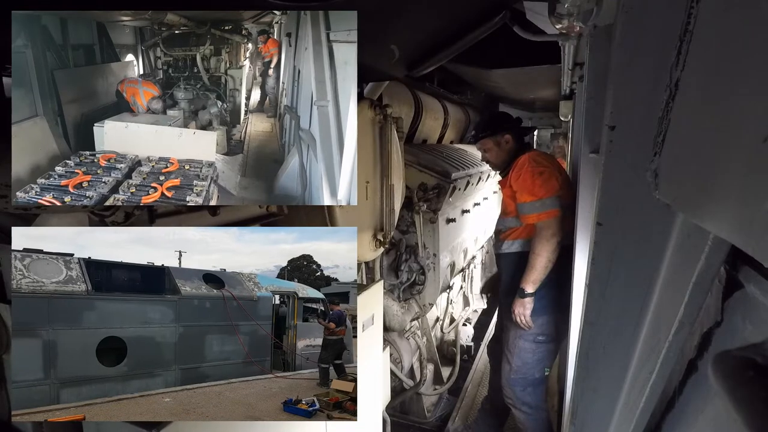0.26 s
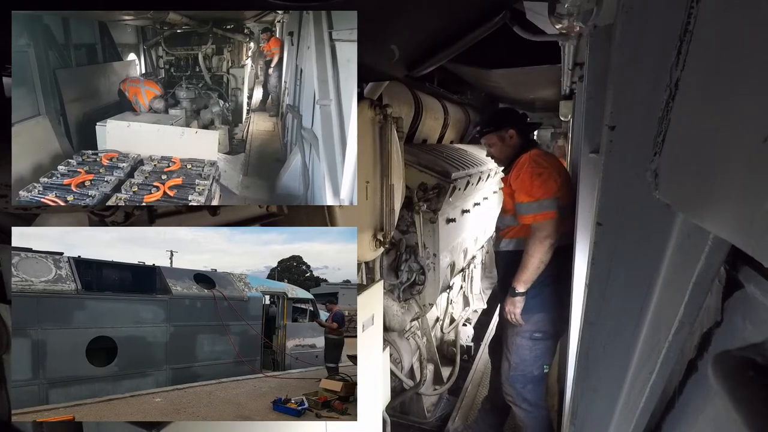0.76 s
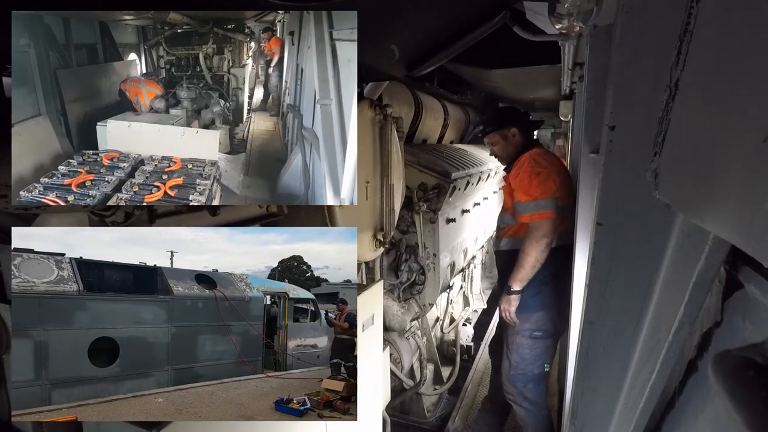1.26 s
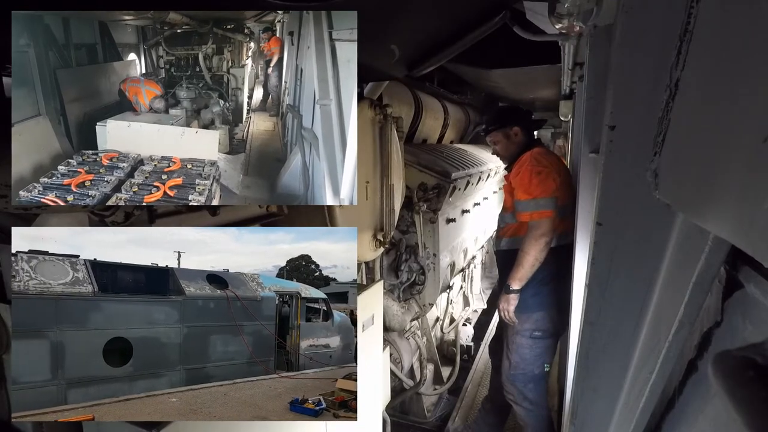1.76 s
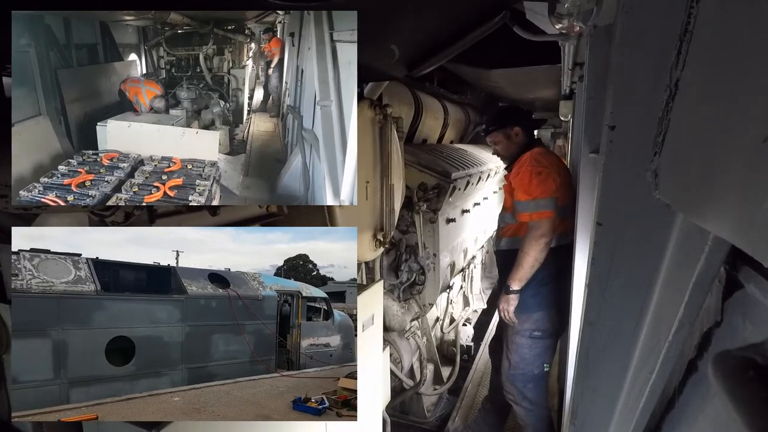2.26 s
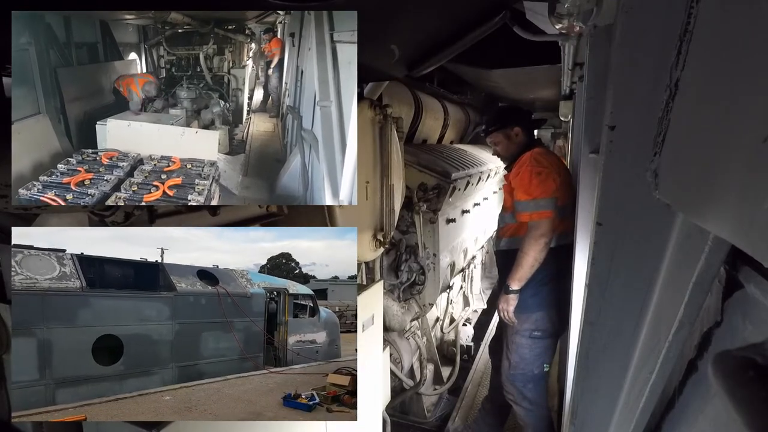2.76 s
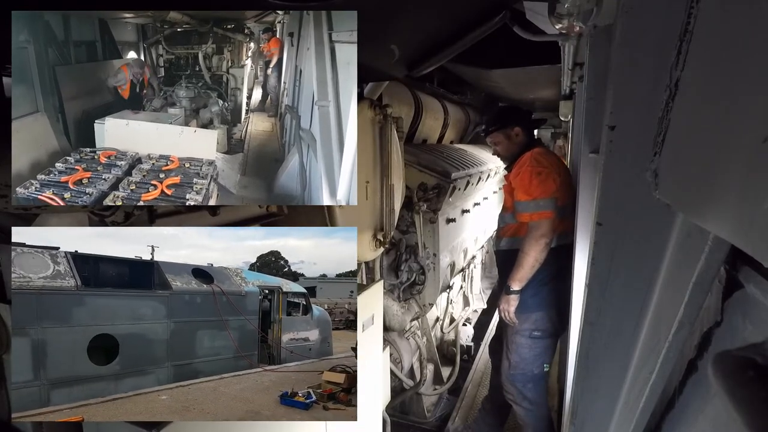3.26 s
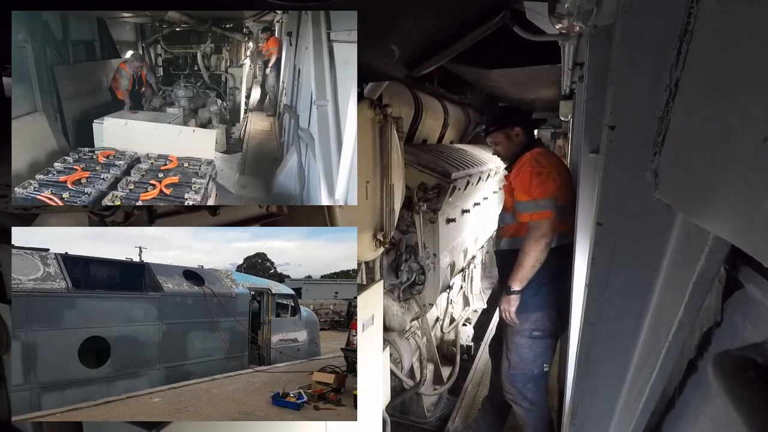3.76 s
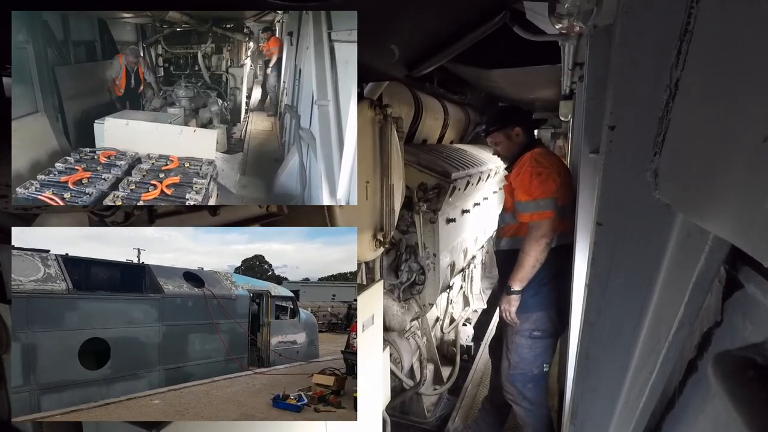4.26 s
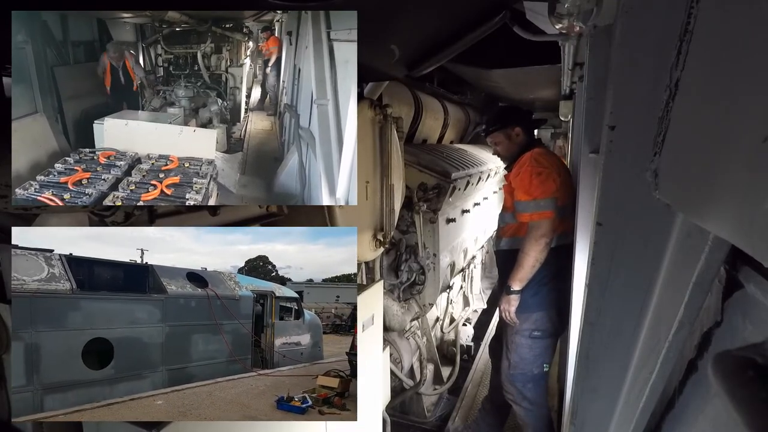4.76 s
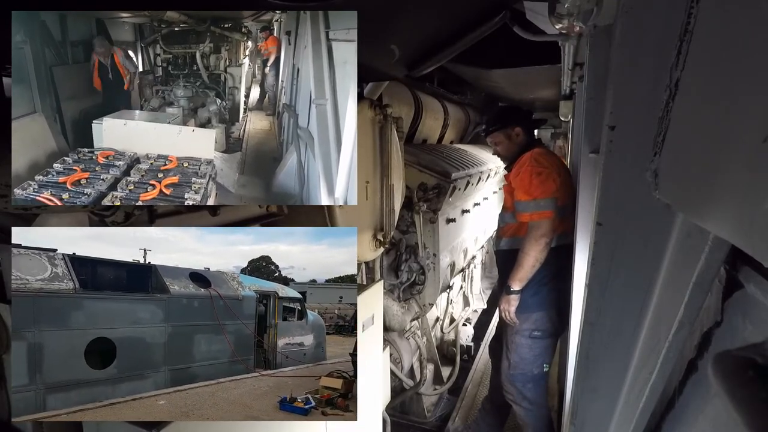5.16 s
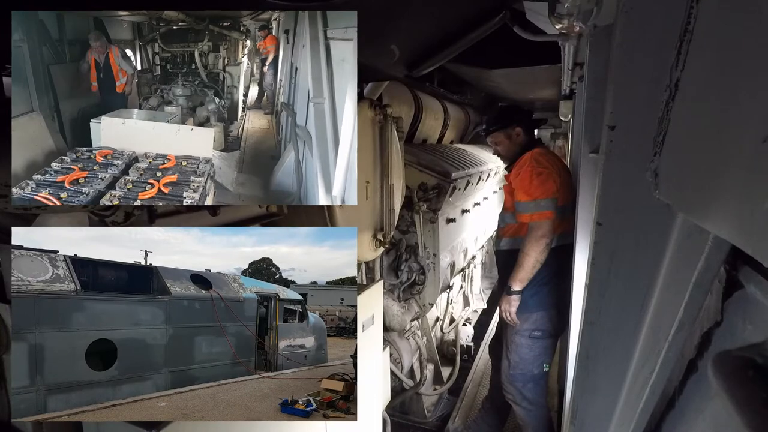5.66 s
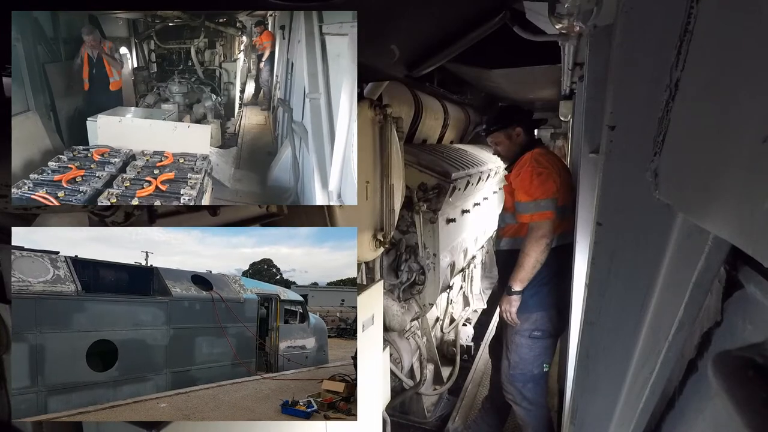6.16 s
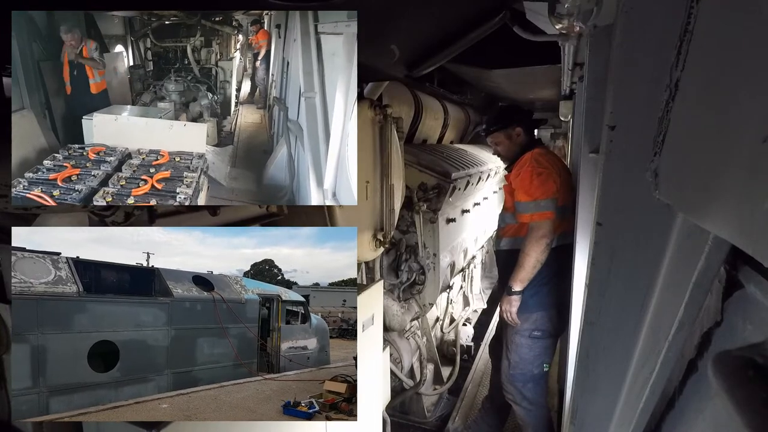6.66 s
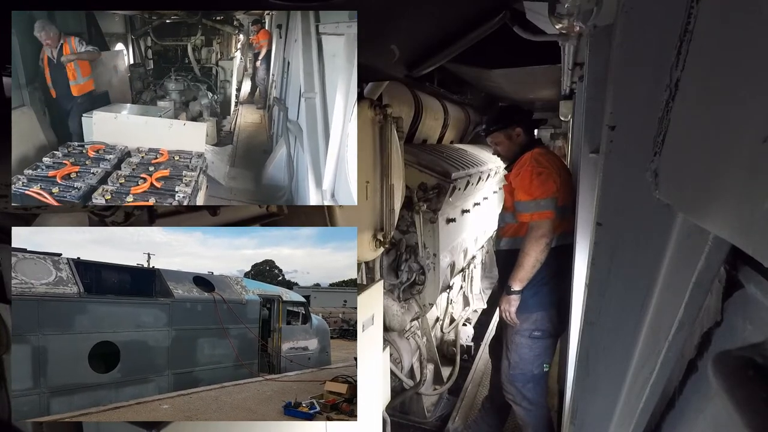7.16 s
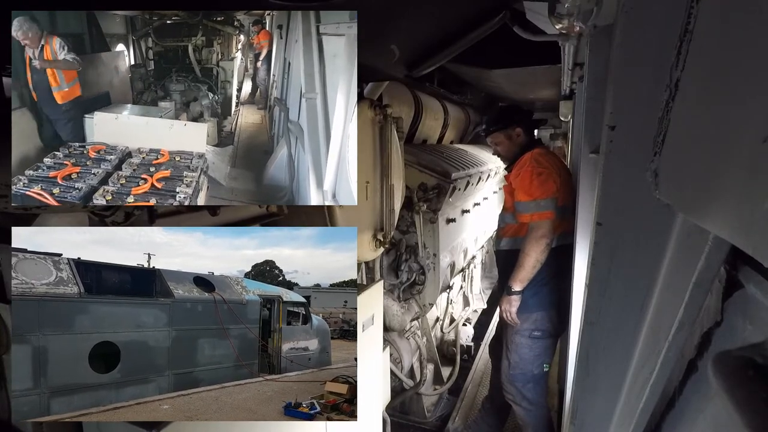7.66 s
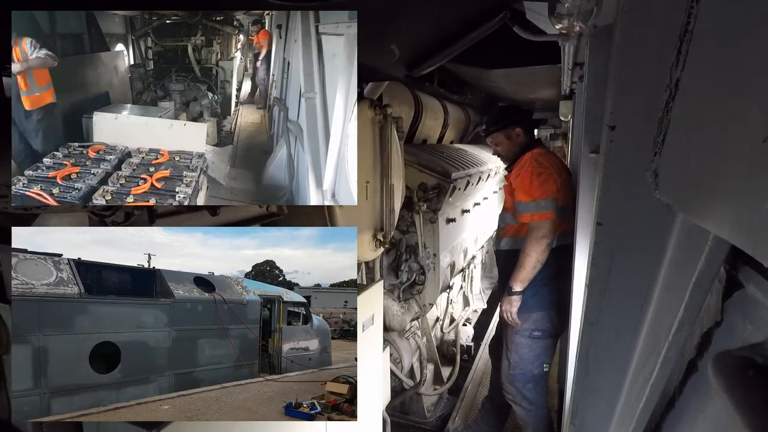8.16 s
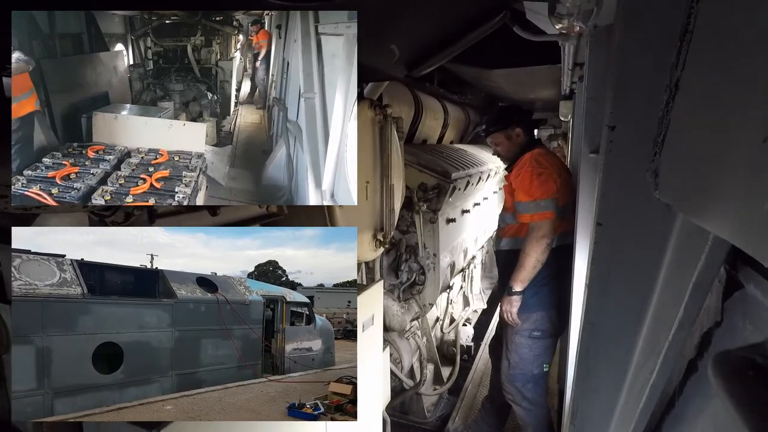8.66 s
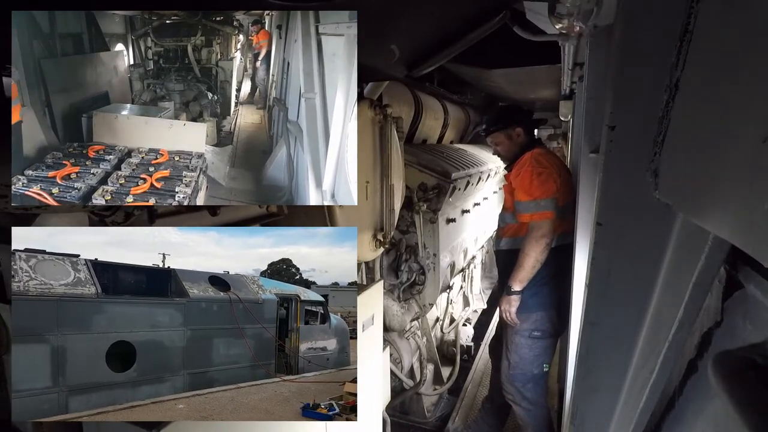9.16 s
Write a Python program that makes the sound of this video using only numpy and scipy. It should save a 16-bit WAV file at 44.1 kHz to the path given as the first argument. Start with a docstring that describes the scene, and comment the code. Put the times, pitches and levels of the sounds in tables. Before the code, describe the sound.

Inside a cramped engine compartment, a heavy diesel runs at constant idle, its deep lumpy throb mixed with rattling covers, humming gears and fizzing mechanical hiss.

```python
"""Inside a locomotive's engine room: a sixteen-cylinder two-stroke diesel idles near 307 rpm, in stereo.
Uneven firing pulses ring low resonances into a boom, and a random rattle repeats on every turn.
Churning noise, sine gear tones, a throbbing drone and two buzzing panel resonances fill the middle.
A bright hiss of rubbing and ticking noise swells once per turn; only its highest part differs by channel."""
import sys
import numpy as np
from scipy import signal
from scipy.fft import rfft, irfft, next_fast_len
from scipy.io import wavfile
from scipy.ndimage import uniform_filter1d, map_coordinates

SR = 44100
rng = np.random.default_rng(int(sys.argv[2]) if len(sys.argv) > 2 else 0)


def log_audio(samples):
    """Write samples as a 16-bit WAV file to the path given in sys.argv[1]."""
    # one column per channel
    frames = np.atleast_2d(samples).T
    # limit to full scale, then quantise
    limited = np.clip(frames, -1, 1)
    pcm = np.round(limited * 32767).astype(np.int16)
    wavfile.write(sys.argv[1], SR, pcm)


N = 414540
T = np.arange(N) / SR  # time [s]

# brief rises in shaft speed: (time [s], half width [s], extra speed [turns/s])
SPEED_SURGES = [(1.107, .988, .0562), (4.8, 1.761, .0162), (8.038, .669, .0193)]
# meshing gear tones: (multiple of crank speed [1], rms level [dB])
GEAR_TONES = [(218, -51), (238, -46.5), (317, -52.5), (394, -50), (475, -54)]
# spectrum of the rubbing and ticking: (frequency [Hz], relative level [dB])
HISS_SPECTRUM = [(600, -24), (1400, -6.5), (2280, -7), (2550, -5.5), (3600, -6), (5100, -3), (6200, 0.44),
                 (7000, -3), (7650, -12.5), (8500, -12), (9800, -20), (11300, -32.5), (12200, -18),
                 (15200, -24.5)]
# steel covers singing in the hiss: (frequency [Hz], width [Hz], relative level [dB])
COVER_MODES = [(2520, 26, 0.5), (2470, 66, -5), (5500, 37, -2), (5930, 34, -2.5), (6240, 41, -4),
               (6900, 44, -4)]
# spectrum of air and oil in the casing: (frequency [Hz], relative level [dB])
CHURN_SPECTRUM = [(60, -20), (110, 5.5), (180, 12.5), (230, 0), (285, 4.5), (330, -3), (450, 0), (560, 3.5),
                  (830, -1), (1020, -8.5), (1280, -11), (1900, -27.5), (4000, -21)]
# knocks of the running gear: (crank position [turns], relative strength [dB])
GEAR_KNOCKS = [(.005, 2.5), (.095, 0), (.156, 4.5), (.25, -6.5), (.405, 3), (.511, -3), (.617, -10),
               (.78, -3), (.965, 5)]
# crankcase panel modes: (frequency [Hz], width [Hz], relative level [dB])
PANEL_MODES = [(271, 5.8, -2.5), (296.8, 10.6, -1.5), (311, 8.5, -3), (364, 6.2, -3), (377.3, 11, 0.5),
               (396, 50, -3.5), (492.4, 16, -1), (528.6, 7.7, 4), (528, 38, -6.5), (563, 16, 2),
               (585, 46, -0.5), (660, 14, 2.5), (674.5, 3.5, 5), (726, 7.7, 1), (744, 16, -20),
               (795, 32, 0), (817, 62, -3.5), (960, 47, -16.5), (1250, 39, -17.5)]
# how well the panels radiate: (frequency [Hz], relative level [dB])
PANEL_RADIATION = [(200, -54), (265, 1), (850, -4.5), (1050, -6.5), (1250, -4.5), (2200, -23)]
# one firing per cylinder and turn: (crank position [turns], relative strength at the listener [dB])
CYLINDER_FIRINGS = [(.025, -5.3), (.076, -11), (.11, -.6), (.175, -7.1), (.216, -1), (.282, -4.8),
                    (.351, -.3), (.423, 5.4), (.464, .5), (.526, -4.6), (.618, 2.2), (.661, -3.3),
                    (.744, 6.4), (.798, -3.7), (.876, -2), (.941, -12)]
# exhaust and room resonances: (frequency [Hz], width [Hz], relative level [dB], sign at the listener [1])
BOOM_MODES = [(40.7, 2.5, -11.2, 1), (76.1, 6.1, -12.8, -1), (92.5, 5.6, -7.2, -1), (118.7, 18.1, -15.4, 1),
              (147.0, 41.2, -19.3, 1), (175.0, 7.8, -8.2, 1), (191.4, 7.0, -16.1, -1),
              (254.8, 7.0, -25.1, -1), (279.5, 33.3, -21.0, 1)]

IDLE_TURNS_PER_S = 5.1001
HISS_DB, SIDE_DB = -28, -2  # rms of the hiss; gain of its part that differs between channels
SWELL_AT_TURNS, SWELL_SQUARENESS = 0.49, 1.28  # where the hiss is strongest; how flat its crest and trough are
HUM_DB, HUM_DB_PER_TURN_PER_S = -25.8, 60  # drone at idle; its rise with speed
CLATTER_DB, CHURN_DB = -19.7, -25  # rms of the running gear; of the air and oil around it
APART_HZ, TOP_HZ = 11000, 15250  # channels differ only above the first; nothing passes above the second


def amp(db):
    """Decibels to gain."""
    return 10 ** (np.asarray(db) / 20)


def unit(x):
    """Scale to rms 1."""
    return x / np.sqrt(np.mean(x ** 2) + 1e-20)


def colour(points, hz):
    """Gain of (frequency [Hz], level [dB]) points on a log axis, closed at both ends."""
    f, db = np.transpose(points)
    return amp(np.interp(np.log(hz + 1), np.log(f + 1), db, left=-120, right=-120))


def wobble(rate):
    """A smooth random curve with rate knots a second."""
    knots = rng.standard_normal(int(N * rate / SR) + 4)
    return map_coordinates(knots, [T * rate])


def filtered(x, response):
    """Filter x by a complex response of frequency."""
    size = next_fast_len(N + SR // 2)
    hz = np.fft.rfftfreq(size, 1 / SR)
    return irfft(rfft(x, size) * response(hz), size)[..., :N]


def noise(spectrum):
    """Coloured noise of rms 1."""
    return unit(filtered(rng.standard_normal(N), lambda hz: colour(spectrum, hz)))


def resonance(f, hz, width):
    """Response of one damped mode, 1 at its centre."""
    return 1j * f * width / (hz * hz - f * f + 1j * f * width)


def mode_power(modes, f):
    """Summed power response of (frequency [Hz], width [Hz], level [dB]) modes."""
    return sum(np.abs(amp(db) * resonance(f, hz, width)) ** 2 for hz, width, db in modes)


def shaft_speed():
    """Turns per second: idle, with a smooth hump for each surge."""
    humps = sum(extra * np.exp(-((T - s) / width) ** 2) for s, width, extra in SPEED_SURGES)
    return IDLE_TURNS_PER_S + humps


def gears(crank, flutter_db, backlash):
    """Tooth-mesh tones, locked to the shaft and unsteadied by backlash (radians)."""
    total = 0
    for order, db in GEAR_TONES:
        level = amp(db + flutter_db * wobble(9)) * np.sqrt(2)
        phase = 2 * np.pi * round(order) * crank + backlash * wobble(7)
        total = total + level * np.sin(phase)
    return total


def hiss(crank, swell_db, bright_swell_db, waver, tick_db, ticks_per_s, ring_db, ring_t60):
    """Fine ticking and rubbing that swells once each turn and rings the steel covers."""
    once_a_turn = np.cos(2 * np.pi * (crank - SWELL_AT_TURNS))
    swell = np.tanh(SWELL_SQUARENESS * once_a_turn) + waver * wobble(20)
    # the walls answer with a decaying noise tail
    t = T[:SR // 3]
    walls = unit(rng.standard_normal(len(t)) * amp(-60 * t / ring_t60)) / np.sqrt(len(t))
    rub, sizes = rng.standard_normal((2, N + len(t) - 1))
    ticks = unit(sizes * (rng.random(len(sizes)) < ticks_per_s / SR))
    contact = rub + amp(tick_db) * ticks
    sound = contact[-N:] + amp(ring_db) * signal.fftconvolve(contact, walls, "valid")

    def tone(hz):
        return colour(HISS_SPECTRUM, hz) * np.sqrt(1 + 2 * mode_power(COVER_MODES, hz))

    def bright(hz):
        return hz ** 4 / (hz ** 4 + 7500 ** 4)

    # harder contact is brighter: the top swells more than the middle
    middle = filtered(unit(sound * amp(swell_db * swell)), lambda hz: tone(hz) * (1 - bright(hz)))
    top = filtered(unit(sound * amp(bright_swell_db * swell)), lambda hz: tone(hz) * bright(hz))
    return unit(middle + top)


def hum(crank, throb, drift, order=56):
    """A drone locked to the shaft, throbbing twice a turn, its phase drifting (radians)."""
    swell = 1 + throb * np.cos(4 * np.pi * (crank - .12))
    return unit(swell * np.sin(2 * np.pi * order * crank + drift * wobble(9.3)))


def knocking(crank, life_turns, bed):
    """Envelope of the knocks, each dying away over a bed of steady motion."""
    angle = np.linspace(0, 1, num=1024)
    blows = sum(amp(db) * np.exp(-((angle - position) % 1) / life_turns) for position, db in GEAR_KNOCKS)
    return unit(bed + np.interp(crank % 1, angle, blows))


def churn(crank):
    """Air and oil churn in the casing, never twice alike, pushed by the knocks."""
    return unit(noise(CHURN_SPECTRUM) * knocking(crank, life_turns=0.06, bed=2.0))


def buzz(speed, level_db, reach):
    """Two loose panels sing while the shaft runs within reach (turns per second) of its top speed."""
    def panels(f):
        return resonance(f, 540, 42) ** 2 + amp(-1.5) * resonance(f, 695, 67) ** 2

    ringing = unit(filtered(rng.standard_normal(N), panels))
    nearness = np.exp(-((speed.max() - speed) / reach) ** 2)
    return amp(level_db) * nearness * ringing


def clatter(crank, slack_turns, even, size=4096):
    """The same parts meet at the same angles, so one random rattle repeats each turn, with a little slack."""
    hz = np.arange(size // 2 + 1) * crank[-1] / T[-1]  # harmonics of the mean shaft speed
    strength = colour(PANEL_RADIATION, hz) * np.sqrt(mode_power(PANEL_MODES, hz))
    rattle = irfft(strength * np.exp(2j * np.pi * rng.random(len(hz))), size)
    # many cylinders share the turn, so no part of it stays quiet for long
    local_power = np.abs(uniform_filter1d(rattle ** 2, size // 12, mode="wrap"))
    rattle = rattle / local_power ** (even / 2)
    angle = (crank + slack_turns * wobble(30)) % 1
    contacts = map_coordinates(rattle, [angle * size], mode="grid-wrap")
    return unit(contacts * knocking(crank, life_turns=0.024, bed=2.2))


def firing(crank, level_db, scatter_db, jitter_s, muffle_hz):
    """One pressure pulse per cylinder and turn rings the low resonances."""
    position, db = np.transpose(CYLINDER_FIRINGS)
    # the engine is already running: two earlier turns leave the body ringing
    turns = np.arange(-2, int(crank[-1]) + 1)[:, None]
    when = np.interp(turns + position, np.r_[-2, crank], np.r_[-2 / IDLE_TURNS_PER_S, T]).ravel()
    chance = rng.standard_normal((len(when), 2))
    strength = amp(np.tile(db, len(turns)) + scatter_db * chance[:, 0]) * (when < T[-1])
    # times before the start wrap to the padded end, whose ringing spills into the start
    size = next_fast_len(N + SR // 2)
    samples = ((when + jitter_s * chance[:, 1]) * SR).astype(int) % size
    pulses = np.bincount(samples, strength, size)

    def body(f):
        return sum(sign * amp(gain_db) * resonance(f, hz, width) for hz, width, gain_db, sign in BOOM_MODES)

    def muffle(f):
        return 1 / np.sqrt(1 + (f / muffle_hz) ** 40)

    return amp(level_db) * unit(filtered(pulses, lambda f: body(f) * muffle(f)))


def scene():
    """The crankshaft drives everything; the engine sits mid-stereo, with only the highest hiss set apart."""
    speed = shaft_speed()
    crank = np.cumsum(speed) / SR  # turns
    beat = firing(crank, level_db=-12.5, scatter_db=0.5, jitter_s=.00006, muffle_hz=252)
    works = amp(CLATTER_DB) * clatter(crank, slack_turns=0.0002, even=0.7)
    works = works + amp(CHURN_DB) * churn(crank)
    hum_db = HUM_DB + HUM_DB_PER_TURN_PER_S * (speed - IDLE_TURNS_PER_S)
    drone = amp(hum_db) * hum(crank, throb=0.25, drift=0.56)
    whine = gears(crank, flutter_db=2.5, backlash=0.51)
    panels = buzz(speed, level_db=-23.5, reach=0.032)
    # two independent draws of the hiss: one shared, one opposed between the channels
    mid, side = [amp(HISS_DB) * hiss(crank, swell_db=2.0, bright_swell_db=4.0, waver=.1, tick_db=-10.3,
                                     ticks_per_s=220, ring_db=-7, ring_t60=0.31) for _ in range(2)]
    side = amp(SIDE_DB) * filtered(side, lambda hz: hz > APART_HZ)
    engine = beat + works + drone + whine + panels + mid
    return np.array([engine + side, engine - side])


def record(dry):
    """Peaks are rounded just below full scale, and nothing passes above the band limit."""
    rounded = dry / (1 + np.abs(dry / .97) ** 8) ** (1 / 8)
    return filtered(rounded, lambda hz: hz < TOP_HZ)


dry = scene()
out = record(dry)
log_audio(out)
```